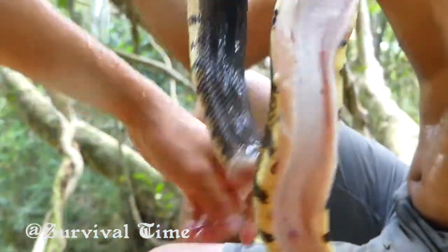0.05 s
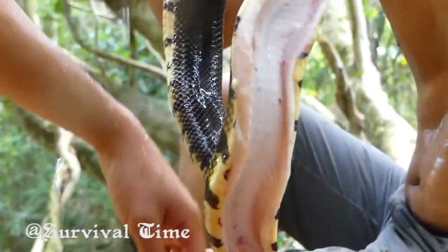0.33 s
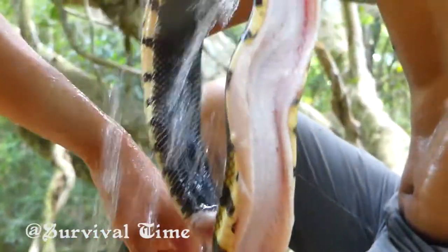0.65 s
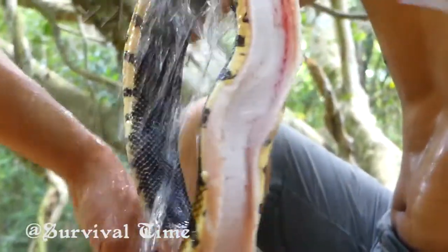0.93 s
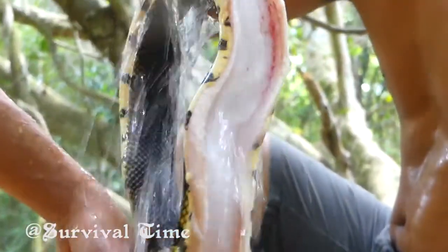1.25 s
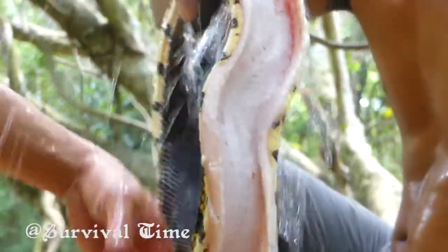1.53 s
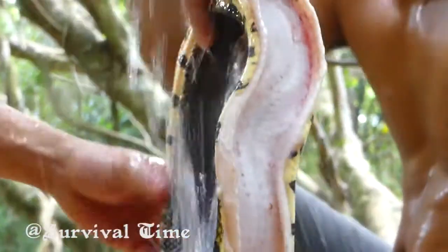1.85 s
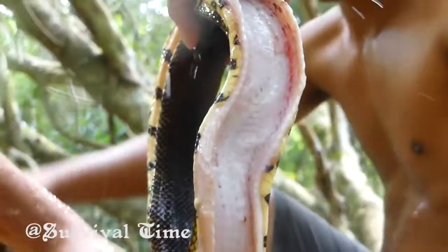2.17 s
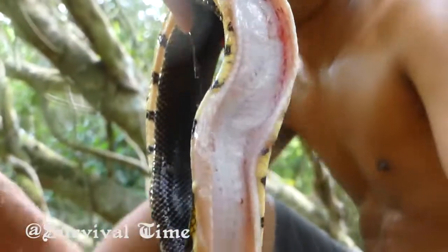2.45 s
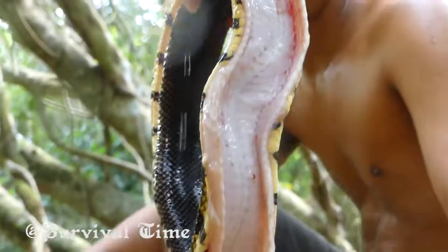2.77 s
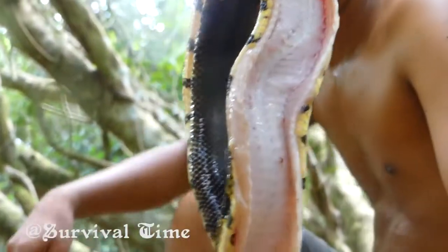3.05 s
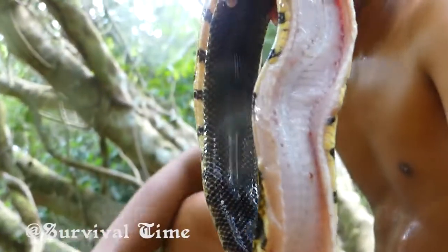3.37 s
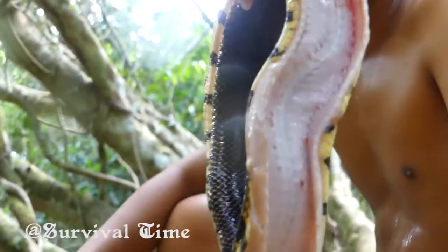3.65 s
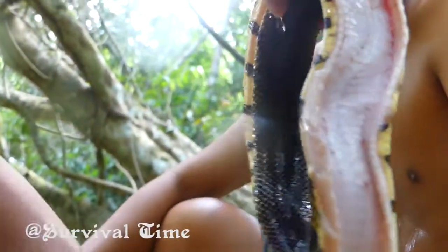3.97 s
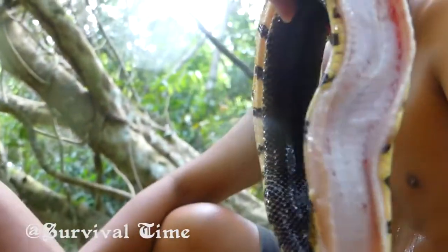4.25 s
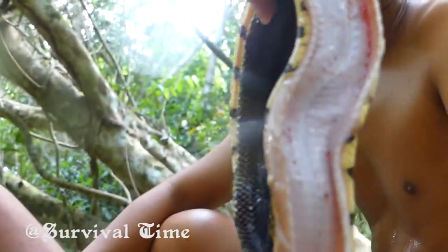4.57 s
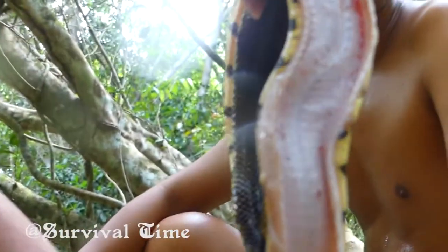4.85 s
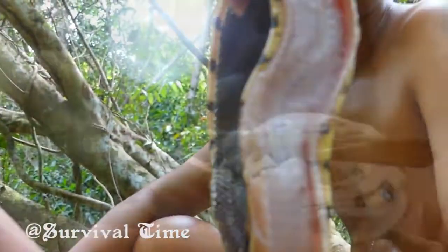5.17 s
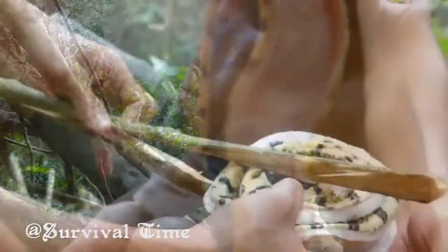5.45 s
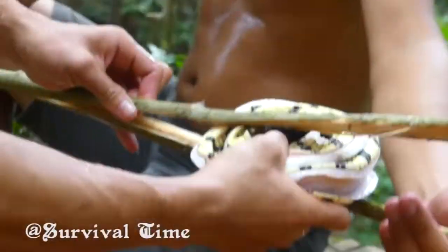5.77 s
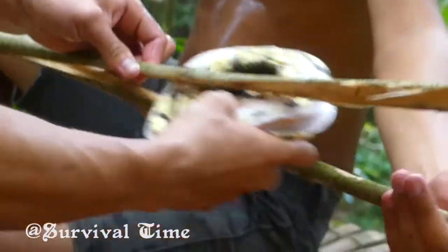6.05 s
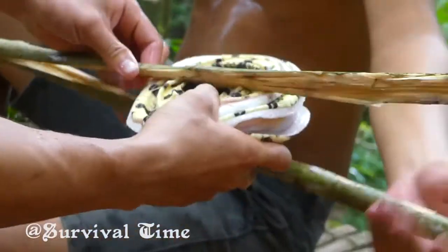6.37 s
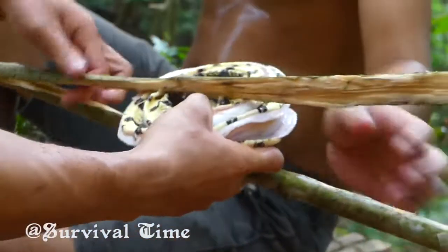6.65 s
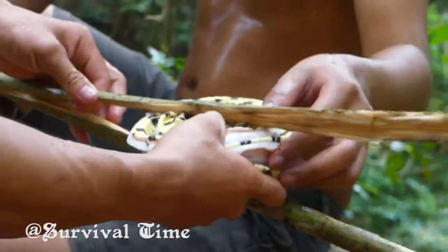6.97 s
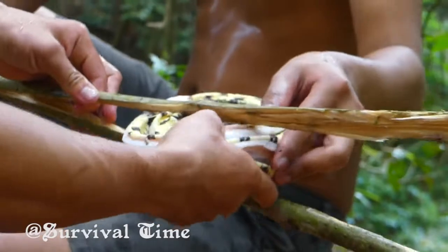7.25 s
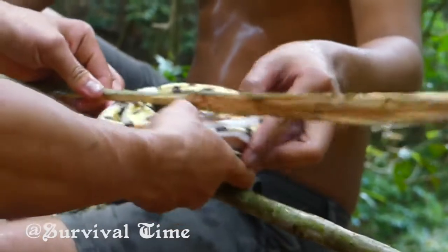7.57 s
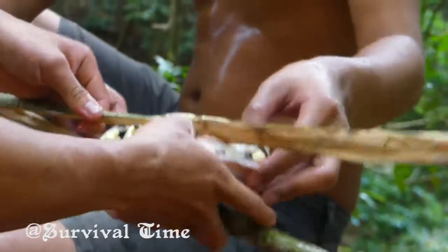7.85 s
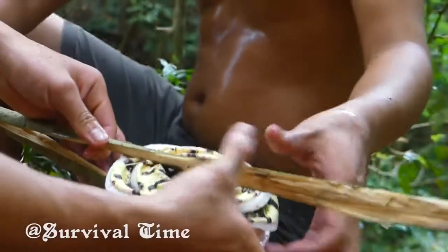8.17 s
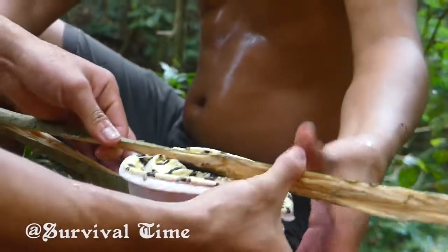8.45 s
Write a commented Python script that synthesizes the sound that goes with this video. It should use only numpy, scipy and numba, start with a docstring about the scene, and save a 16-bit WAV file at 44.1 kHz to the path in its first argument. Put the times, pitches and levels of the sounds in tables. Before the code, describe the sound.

In a forest with a steady, high insect drone and a faint rumble of air, water is poured over meat in uneven, splashing surges, then runs off in ever sparser drips. Past the middle, a dry, hollow knock sounds as a split stick closes on the meat, and faint rubs and fibre snaps follow. The water and stick are close and centred, in nearly mono sound.

```python
"""Water splatters over a skinned snake, close to one nearly mono microphone in a forest.
Drops burst into spray, trapped air gurgles, and the stream drums on something hollow below, then drips off.
From 5.5 s the coiled meat is clamped in a split bamboo stick, which knocks, rubs and cracks.
Farther off among the trees, insects drone throughout over a soft rumble and hiss of air."""
import sys
import numpy as np
from scipy import signal
from scipy.fft import rfft, irfft, next_fast_len
from scipy.io import wavfile
from scipy.ndimage import uniform_filter1d
from numba import njit

SR = 44100
rng = np.random.default_rng(int(sys.argv[2]) if len(sys.argv) > 2 else 0)


def persist_wave(psi):
    """Save psi, clipped to +-1, as 16-bit WAV."""
    counts = np.round(np.clip(psi, -1, 1) * 32767).astype(np.int16)
    wavfile.write(sys.argv[1], SR, np.atleast_2d(counts).T)


N = 384552
TIME = np.arange(N) / SR

# strength of the falling water, poured until 2 s and then running off: (time [s], level [dB])
WATER_FLOW = [(0, -52.5), (0.54, -48.5), (0.69, -42), (0.74, -33.5), (0.84, -39.5), (0.94, -33.5),
              (1.04, -38), (1.39, -30.5), (1.47, -36), (1.7, -29.5), (1.8, -25), (1.97, -27), (2.04, -33),
              (2.42, -40.5), (3.1, -45), (3.28, -50.5), (3.85, -53), (5.4, -59)]


def pouring():
    """Close up, droplets burst into spray and small bubbles gurgle; both thicken as the flow grows."""
    # spectrum of the spray: (frequency [Hz], relative level [dB])
    spray_spectrum = [(410, -56), (700, -16.5), (1600, -12), (2000, -13), (2660, -5.5), (2990, -11.5),
                      (5860, -5.5), (8540, -4), (10800, -11.5), (14000, -8), (15500, -18)]
    # gulps of air dragged under, each a cluster of small bubbles: (time [s], length [s], level [dB])
    gulps = [(.67, 0.0917, -45), (1.09, 0.0599, -43.5), (1.36, 0.0307, -42.5), (1.56, 0.0525, -37),
             (1.75, 0.02076, -28), (1.97, 0.05145, -38), (2.3, 0.2434, -46), (2.72, 0.2805, -45),
             (3.03, 0.10097, -42.5), (3.57, 0.0337, -53), (3.79, 0.0668, -49)]
    flow = curve(WATER_FLOW)
    gurgle = np.hypot(undb(-23) * flow ** 0.68983, swells(gulps, attack_s=.02, release_s=.025))
    # a weak stream breaks into single drips and its hiss stops
    flow = np.sqrt(np.maximum(flow ** 2 - undb(-56) ** 2, 0))
    gurgle = np.sqrt(np.maximum(gurgle ** 2 - undb(-66) ** 2, 0))
    drops_per_s = 420 + 2300 * (flow / flow.max())
    drops = shower(drops_per_s, 2200, 15030, cycles=6.2, spread_db=5, rise=0.062, burst_s=.005, pieces=3)
    mist = rng.standard_normal(N) * undb(5.1 * wander(160))
    spray = unit(colour(drops + undb(0.5) * mist, spray_spectrum)) * flow * undb(1.0)
    bubbles_per_s = 80 + drops_per_s * .13
    bubbles = shower(bubbles_per_s, 1204.8, 4200, cycles=11.56, spread_db=2, rise=0.14, burst_s=.006,
                     pieces=2)
    wash = shower(drops_per_s, 120, 1214.6, cycles=1.7, spread_db=2.5, rise=0, burst_s=.004)
    wash = unit(colour(wash, [(100, -5), (300, -5), (1200, -12)])) * (gurgle / gurgle.max()) ** 0.36806
    return spray + bubbles * gurgle + wash * undb(-47.5)


def splashes():
    """Water lands by the microphone in bright slaps, lesser drips and heavy, dull plops."""
    # the loudest slaps and drips: (time [s], level [dB], centre [Hz], width [octaves])
    splats = [(.0345, -38, 8558, 0.8926), (.076, -38.5, 1940, 0.4375), (.2976, -34, 3500, 2.38),
              (.3292, -49, 4496, 0.4856), (.394, -42, 946.7, 0.3354), (.4073, -40.5, 4490, 4.15),
              (.3388, -16, 5497, 0.5431), (.3412, -17.5, 8089, 0.04605), (.3645, -29.5, 8463, 0.4277),
              (.3672, -26.5, 4331, 0.1049), (.6095, -37, 5200, 1.126), (.644, -35, 3126, 0.3395),
              (.7374, -25.5, 6195, 0.3588), (.8175, -23, 5384, 1.069), (.8314, -24, 6425, 0.585),
              (.8643, -26.5, 6987, 0.405), (.8925, -23.5, 4213, 0.2798), (.9009, -24, 7285, 0.4167),
              (.9124, -24.5, 6447, 0.5694), (.955, -25, 8675, 0.4153), (1.0465, -19, 8417, 0.1498),
              (1.0743, -20.5, 5193, 0.643), (1.1586, -20, 7558, 0.6326), (1.1746, -20.5, 7847, 0.2012),
              (1.2167, -23.5, 7483, 0.2526), (1.2683, -23.5, 4564, 0.166), (1.2992, -25, 6120, 0.449),
              (1.3648, -18.5, 5697, 0.9105), (1.3841, -20, 8192, 0.2292), (1.3985, -19, 4664, 0.8774),
              (1.4436, -14.5, 7926, 0.15725), (1.5117, -27, 5717, 0.3626), (1.5785, -23.5, 5190, 0.985),
              (1.612, -24.5, 2833, 0.8513), (1.8181, -18.5, 5291, 1.515), (1.8678, -18.5, 4602, 0.7),
              (1.8836, -17, 6824, 0.5), (1.9336, -21.5, 6500, 0.685), (1.938, -18.5, 5138, 1.075),
              (1.9662, -18.5, 4357, 1.09), (1.9869, -23.5, 5625, 0.747), (2.1318, -25, 5567, 0.611),
              (2.1489, -27, 5180, 0.6496), (2.2806, -29, 5277, 0.3674), (2.3356, -27, 6953, 0.228),
              (2.4235, -30, 3832, 0.3387), (2.6186, -33, 6670, 0.2547), (2.6364, -30.5, 3523, 0.1987),
              (2.7127, -20.5, 4575, 0.7617), (2.885, -36.5, 3292, 0.3367), (2.9365, -36, 4450, 0.794),
              (3.0699, -27, 2617, 0.4324), (3.4338, -39, 3060, 0.828), (3.5638, -41, 2554, 0.391),
              (3.6705, -39.5, 6244, 1.086), (3.8044, -41.5, 4508, 1.428), (3.8938, -38.5, 7893, 0.2636),
              (3.9553, -38.5, 7742, 0.4295), (4.34, -46.5, 2661, 0.2056), (4.424, -47.5, 2358, 0.4137),
              (4.6036, -40, 2730, 0.4814), (4.6512, -41, 6306, 0.756), (4.8143, -38, 6192, 0.2184),
              (4.9563, -30.5, 2549, 0.24486), (5.178, -46.5, 8380, 0.178), (5.2996, -38.5, 8659, 0.0628)]
    # heavy plops: (time [s], level [dB], centre [Hz], width [octaves])
    plops = [(.299, -38.5, 1105, 0.6343), (2.696, -33, 930.2, 0.4453), (2.7127, -32.5, 598.6, 1.07),
             (3.0118, -31.5, 867.5, 0.793), (3.068, -37, 693, 0.8845), (3.4023, -31.5, 1262, 0.8535),
             (3.859, -34.5, 1439, 1.49), (4.752, -44, 796, 0.992), (4.7982, -43.5, 1601, 1.458),
             (4.802, -47, 417.8, 0.264)]
    bright = hits(splats + drip_rows(), t60=0.019308, tail_db=6, skirt_db=-31, focus=1.5)
    dull = hits(plops, t60=0.06504, tail_db=6, skirt_db=-34.5, focus=0.7688)
    return bright + dull


def drip_rows(drips_per_s=11, width_octaves=.45, count=300):
    """Rows for hits(): lesser drips at random times and pitches, stronger while more water falls."""
    when, luck = rng.random((count, 2)).T
    size, pitch = rng.standard_normal((count, 2)).T
    s = when * N / SR
    flow_db = np.interp(s, *np.transpose(WATER_FLOW))
    db = -12.5 + 0.6841 * flow_db + 1.5 * size
    hz = 5116 * 2 ** (0.71 * pitch.clip(-2, 1))
    falls = (luck < drips_per_s * N / SR / count) & (s < WATER_FLOW[-1][0])
    return list(np.column_stack([s, db, hz, np.full(count, width_octaves)])[falls])


def plinks():
    """Larger air pockets ring and rise in pitch as they surface."""
    # trapped air: (time [s], level before the attack [dB], pitch [Hz], t60 [s], rise [octaves])
    air_pockets = [(.574, -39, 701.6, 0.09123, 0.225), (.674, -30, 1935, 0.03687, 0.2774),
                   (0.693, -36.5, 1568, 0.04955, 0.074), (1.887, 7.5, 1447, 0.009812, 0.6658),
                   (1.8902, -5, 1950, 0.010025, 0), (2.907, -27, 1375, 0.0822, 0.987),
                   (2.992, -31, 1719, 0.0329, 0.282), (3.12, -25, 1791, 0.02564, 0.1115),
                   (3.143, -23.5, 1580, 0.03712, 0.5688), (3.86, -24.5, 1331, 0.02456, 0),
                   (7.132, -38, 436, 0.0689, 0.907)]
    out, t = np.zeros(N), TIME[:SR // 5]
    attack = 1 - np.exp(-t / 0.0011964)
    for s, db, hz, t60, rise in air_pockets:
        glide_hz = hz * 2 ** (rise * np.minimum(t / t60, 1))
        phase = 2 * np.pi * np.cumsum(glide_hz) / SR
        add(out, s, undb(db) * np.sin(phase) * np.exp(-np.log(1000) * t / t60) * attack)
    return out


def drumming(beats_per_s=160):
    """Lumps of the stream beat on a hollow surface below and keep its low modes ringing."""
    # modes of the hollow surface: (frequency [Hz], width [Hz], relative level [dB])
    hollow_modes = [(62, 12, -10.5), (84, 16, -4.5), (151.39, 24, -8), (235.84, 7.5, 2),
                    (334.82, 53.9, -12)]
    # lumps of water landing: (time [s], length [s], level [dB])
    lumps = [(.718, 0.0239, -37), (.912, 0.02248, -41.5), (1.022, 0.3765, -45.5), (1.425, 0.0315, -42.5),
             (1.502, 0.018, -41), (1.618, 0.02175, -43.5), (2.924, 0.02292, -43)]
    beats = rng.standard_normal(N) * (rng.random(N) < beats_per_s / SR)
    ringing = resonate(beats, hollow_modes)
    body = colour(ringing, [(25, -14.5), (60, 6), (300, -5.5), (700, -4.5), (3000, -47.5)])
    steady = body / np.sqrt(uniform_filter1d(body ** 2, SR // 8) + 1e-12)
    return steady * swells(lumps, attack_s=0.010446, release_s=0.059)


def knock(time_s=5.5413):
    """One dry, hollow blow on the bamboo as it closes on the meat."""
    # spectrum of the struck bamboo: (frequency [Hz], relative level [dB])
    bamboo_spectrum = [(59, -46.5), (100, -19), (407, 3), (594, -5.5), (1000, 0), (1160, -8), (1400, -0.5),
                       (1880, -8), (2750, -1), (4000, -13.5), (5040, -7.5), (7830, -16), (8880, -7.5),
                       (10100, -25), (15000, -28.5)]
    out = np.zeros(N)
    blow = colour(scatter(t60=0.03414, tail_db=2), bamboo_spectrum)
    add(out, time_s, set_onset_level(blow, db=-25.5))
    return out


def stick(slips_per_s=900):
    """Close up, quick slips ring the stick, wet skin crackles on it and bamboo fibres crack."""
    # the stick sliding under the hands: (time [s], length [s], level [dB])
    rubs = [(7.365, 0.15088, -54), (7.578, 0.12696, -46), (7.739, 0.0952, -53.5), (7.875, 0.09482, -51.5),
            (7.978, 0.05082, -57), (8.223, 0.04055, -56.5)]
    # modes of the stick: (frequency [Hz], width [Hz], relative level [dB])
    stick_modes = [(882.4, 586, -10), (1478, 58.66, 4), (1830, 113.8, -5)]
    # wet skin pressed against the stick: (time [s], length [s], level [dB])
    squeezes = [(5.535, 0.0792, -52), (5.66, 0.1577, -56), (5.99, 0.1384, -54), (7.27, 0.048, -57),
                (7.57, 0.0327, -47.5), (7.85, 0.0918, -59)]
    # fibre cracks and soft bumps: (time [s], level [dB], centre [Hz], width [octaves])
    cracks = [(5.5788, -45, 1799, 1.23), (5.613, -43.5, 2939, 0.2947), (5.681, -44, 3319, 0.3206),
              (5.7407, -46, 2331, 0.134), (5.782, -44.5, 3340, 0.99), (6.0706, -43.5, 8500, 0.18),
              (6.1317, -40, 8070, 0.2633), (6.1423, -31, 8782, 0.1023), (6.154, -43, 8000, 0.367),
              (6.4515, -47, 7500, .38), (7.0693, -46, 1090, .89), (7.135, -52.5, 1400, 0.532),
              (7.19, -54, 94.19, 0.563), (7.277, -48, 7700, .27), (7.3032, -47.5, 3319, 0.34),
              (7.3392, -45, 6500, 0.299), (7.5845, -33.5, 7130, 0.5172), (7.6198, -31, 9522, 0.2491),
              (7.6291, -40.5, 7525, .75), (8.1249, -42.5, 8653, 0.16), (8.4318, -43.5, 1710, 0.37),
              (8.4326, -31, 8358, 0.548)]
    pressure = np.zeros(N)
    for s, length, db in rubs:
        add(pressure, s, undb(db) * np.hanning(int(length * SR)) ** .5)
    slips = rng.standard_normal(N) * (rng.random(N) < slips_per_s / SR)
    ringing = resonate(slips, stick_modes)
    rub = unit(colour(ringing, [(300, -9.5), (700, 0), (2200, -3.5), (4000, -7.5)])) * pressure
    ticks = shower(np.full(N, 1100.), 1239.4, 10580, cycles=2.766, spread_db=2.5, rise=0, burst_s=.003,
                   pieces=2)
    crackle = unit(colour(ticks, [(1000, -3), (2600, -6), (7000, -2), (13000, -11)]))
    crackle *= swells(squeezes, attack_s=0.00856, release_s=0.05265)
    return hits(cracks, t60=0.03294, tail_db=-1, skirt_db=-21, focus=1) + rub + crackle


def echoes(near, t60=0.094, delay_s=.004):
    """Ground and trunks throw close sounds back at the microphone; returns two unlike echo signals."""
    t = TIME[:SR // 4]
    tails = rng.standard_normal((2, len(t))) * np.exp(-np.log(1000) * t / t60) * (t > delay_s)
    return [signal.fftconvolve(near, tail / np.linalg.norm(tail))[:N] for tail in tails]


def insects():
    """A distant chorus merges into one shimmering band; single callers glide through it."""
    # spectrum of the chorus: (frequency [Hz], relative level [dB])
    chorus_spectrum = [(3750, -34), (4100, -7.5), (4350, 1.5), (4650, 3.5), (5000, 2.5), (5300, -5.5),
                       (5750, -14), (6300, -32.5)]
    # faint, far calls: (time [s], length [s], start [Hz], end [Hz], width [Hz], level [dB])
    calls = [(4.963, 0.3874, 6035, 5999, 139.7, -55), (5.182, 0.253, 3790, 3705, 140, -63),
             (5.38, 0.4764, 3753, 3830, 150, -56.5), (5.929, 0.3428, 689.1, 774.8, 70, -61.5),
             (6.181, .12, 5912, 5600, 400, -57), (6.471, 0.23, 5892, 6592, 597, -61),
             (6.568, .26, 6876, 6700, 750, -58), (8.269, 0.08446, 6001, 5748, 400, -53.5)]
    chorus = unit(colour(rng.standard_normal(N), chorus_spectrum)) * undb(-52 + wander(11))
    for s, length, start_hz, end_hz, width, db in calls:
        n = int(length * SR)
        lowpass = signal.butter(2, width / 2, fs=SR, output="sos")
        rasp = signal.sosfilt(lowpass, rng.standard_normal(n) + 1j * rng.standard_normal(n))
        glide = np.exp(2j * np.pi * np.cumsum(np.linspace(start_hz, end_hz, n)) / SR)
        envelope = np.sin(np.pi * np.linspace(0, 1, n) ** .5)  # quick swell, slow fade
        add(chorus, s, undb(db) * envelope * unit(np.real(rasp * glide)))
    return chorus


def forest():
    """Soft rumble and hiss of the air among the trees."""
    # spectrum of the air: (frequency [Hz], relative level [dB])
    air_spectrum = [(20, 8.5), (60, 11.5), (110, 9), (170, 9), (350, 4.5), (700, 2.5), (1500, -1),
                    (3300, -2), (7000, -0.5), (9000, 0.5), (11000, -2.5), (15500, -4)]
    return unit(colour(rng.standard_normal(N), air_spectrum)) * undb(-53.5 + 0.41 * wander(4.4))


def shower(per_s, low_hz, high_hz, cycles, spread_db, rise, burst_s, pieces=1, count=40000):
    """Random drops at a moving rate; each breaks into pieces, grains of like pitch, within burst_s."""
    when, luck, pitch, ring, strength = rng.random((count, 5)).T
    chance = np.minimum(per_s[(when * N).astype(int)] * N / SR / count, 1)
    late, detune = rng.random((2, pieces, count))
    start = np.floor(np.minimum(when * N + late ** 2 * burst_s * SR, N - 1))
    hz = np.minimum(low_hz * (high_hz / low_hz) ** pitch * 2 ** ((detune - .5) / 2), SR / 2)
    cycles = cycles * 2 ** (2 * ring - 1) * np.ones((pieces, 1))
    # mean power is even over time and frequency; later grains are weaker
    size = undb(-spread_db * np.log(strength + .02)) * (1 - late / 2) * hz / np.sqrt(cycles)
    size = size / np.sqrt(np.sum(size ** 2 * cycles * SR / hz) / 4 / N * chance)
    return grains(*(a[:, luck < chance].ravel() for a in (start, hz, cycles, size)), float(rise))


@njit
def grains(start, hz, cycles, size, rise):
    """Damped sines that lose 1 neper in the given cycles and rise in pitch as they die."""
    out = np.zeros(N)
    for k in range(len(start)):
        life, phase = cycles[k] * SR / hz[k], 0.
        for i in range(min(int(5 * life), N - int(start[k]))):
            phase += 2 * np.pi * hz[k] * (1 + rise * i / (5 * life)) / SR
            out[int(start[k]) + i] += size[k] * np.exp(-i / life) * np.sin(phase)
    return out


def hits(rows, t60, tail_db, skirt_db, focus):
    """Each contact is a click and a brief spatter in a band of its own, narrower with more focus."""
    out, octaves = np.zeros(N), np.linspace(-6, 6, 97)
    for s, db, hz, width in rows:
        bell_db = -focus * 10 * np.log10(np.e) * (octaves / width) ** 2 / 2
        band_db = np.maximum(bell_db, skirt_db - 3.482 * np.abs(octaves)) - 3 * octaves.clip(-1, 2)
        hit = colour(scatter(t60, tail_db), np.column_stack([hz * 2 ** octaves, band_db]))
        add(out, s, set_onset_level(hit, db))
    return out


def scatter(t60, tail_db, count=2048):
    """A click followed by a dying spatter whose energy is tail_db relative to the click."""
    tail = rng.standard_normal(count) * undb(-60 * np.arange(count) / SR / t60)
    tail *= undb(tail_db) / np.linalg.norm(tail)
    tail[0] += 1
    return tail


def resonate(x, modes):
    """Ring x through (frequency [Hz], width [Hz], gain [dB]) resonances."""
    return sum(undb(db) * signal.lfilter(*signal.iirpeak(hz, hz / width, fs=SR), x)
               for hz, width, db in modes)


def colour(x, points):
    """Minimum-phase filter through (frequency [Hz], gain [dB]) points."""
    n = 2 * next_fast_len(len(x) // 2 + 512)
    hz, db = np.transpose(points)
    gain = undb(np.interp(np.log(np.arange(n // 2 + 1) * SR / n + 1), np.log(hz), db))
    cepstrum = irfft(np.log(gain))
    cepstrum[1:n // 2] *= 2
    cepstrum[n // 2 + 1:] = 0
    return irfft(rfft(x, n) * np.exp(rfft(cepstrum)), n)[:len(x)]


def swells(rows, attack_s, release_s):
    """Gain over time: each (time [s], length [s], level [dB]) row rises, holds and dies away."""
    power, t = np.zeros(N), TIME[:SR]
    for s, length, db in rows:
        release = np.exp(-np.maximum(t - length, 0) / release_s)
        add(power, s, (undb(db) * np.minimum(t / attack_s, 1) * release) ** 2)
    return np.sqrt(power)


def curve(rows):
    """Gain through (time [s], level [dB]) points; silent outside their span."""
    return undb(np.interp(TIME, *np.transpose(rows), left=-120, right=-120))


def wander(steps_per_s):
    """Smooth random drift with a spread near 1."""
    k = int(SR / steps_per_s)
    steps = np.repeat(rng.standard_normal(N // k + 1), k)
    return np.sqrt(2) * uniform_filter1d(uniform_filter1d(steps, k), k)[:N]


def set_onset_level(x, db):
    """Scale so that the first 5 ms have an rms level of db."""
    return x * undb(db) / np.sqrt(np.mean(x[:220] ** 2))


def undb(db):
    """Decibels to gain."""
    return 10 ** (np.asarray(db) / 20)


def unit(x):
    """Scale to rms 1."""
    return x / np.sqrt(np.mean(x ** 2))


def add(out, s, sound):
    """Mix a sound in at time s."""
    i = max(int(s * SR), 0)
    out[i:i + len(sound)] += sound[:max(N - i, 0)]


def scene():
    """Water and bamboo sit close and centred; only their echoes, the insects and the air have width."""
    near = pouring() + splashes() + plinks() + drumming() + knock() + stick()
    mid_echo, side_echo = echoes(near)
    mid = near + undb(-14) * mid_echo + insects() + forest()
    side_echo = colour(side_echo, [(100, -28), (500, -31), (1400, -43), (4000, -60.5), (12000, -24.5)])
    side = side_echo + undb(-16.5) * forest() + undb(-33) * insects()
    return np.array([mid + side, mid - side])


def record(dry):
    """The recorder has a narrow notch in the treble, clips at full scale and cuts the top."""
    notch_hz, top_hz = 5950, 15900
    notched = signal.lfilter(*signal.iirnotch(notch_hz, Q=45, fs=SR), dry)
    lowpass = signal.ellip(10, .2, 70, top_hz, fs=SR, output="sos")
    return signal.sosfilt(lowpass, np.clip(notched, -1, 1))


dry = scene()
out = record(dry)
persist_wave(out)
```